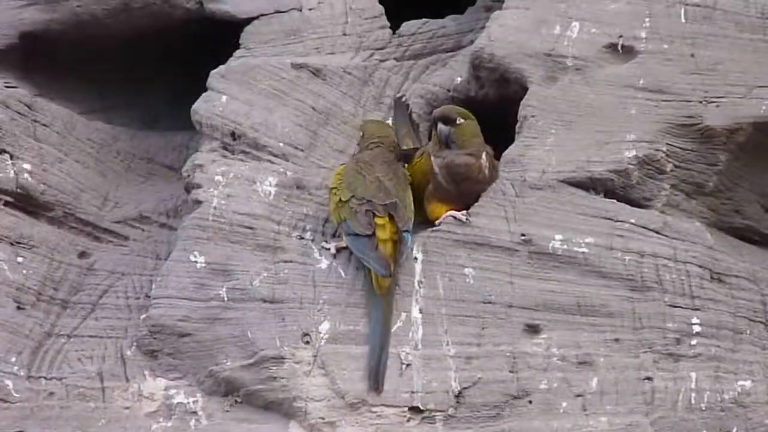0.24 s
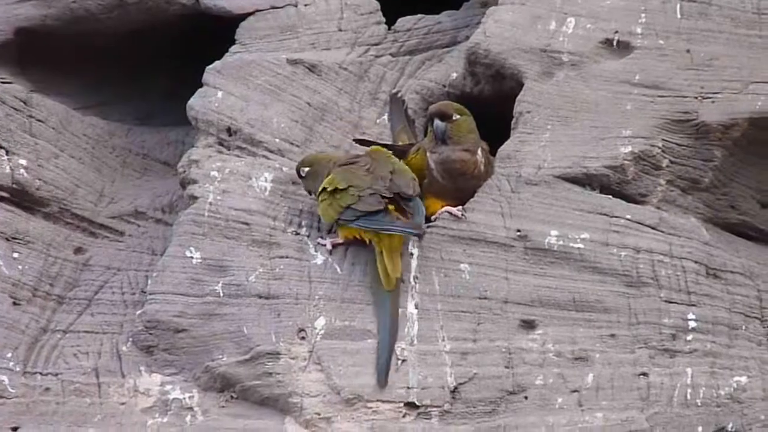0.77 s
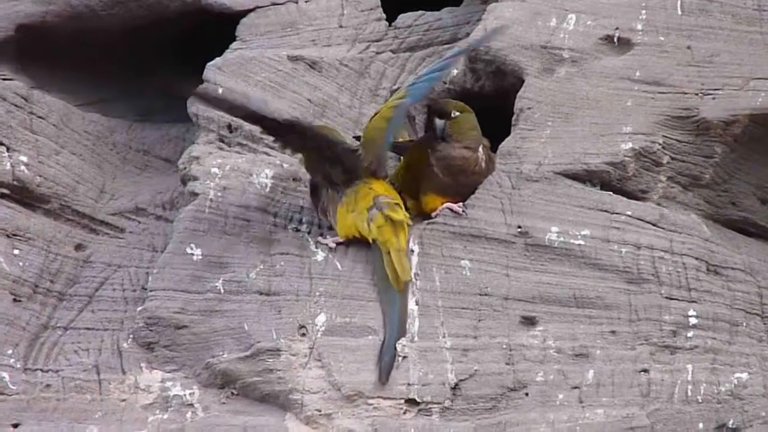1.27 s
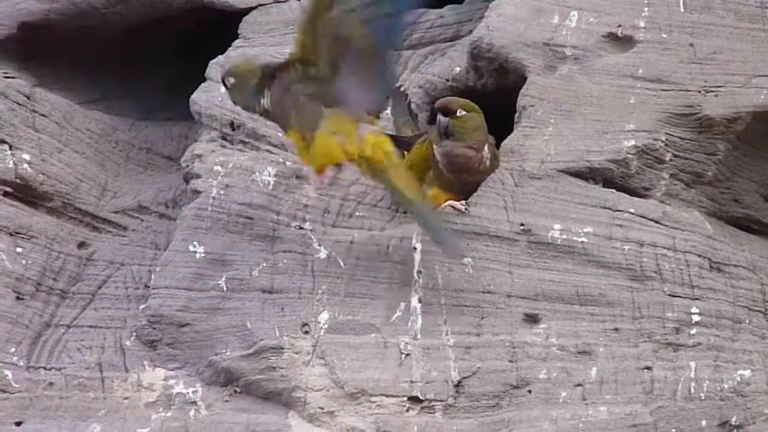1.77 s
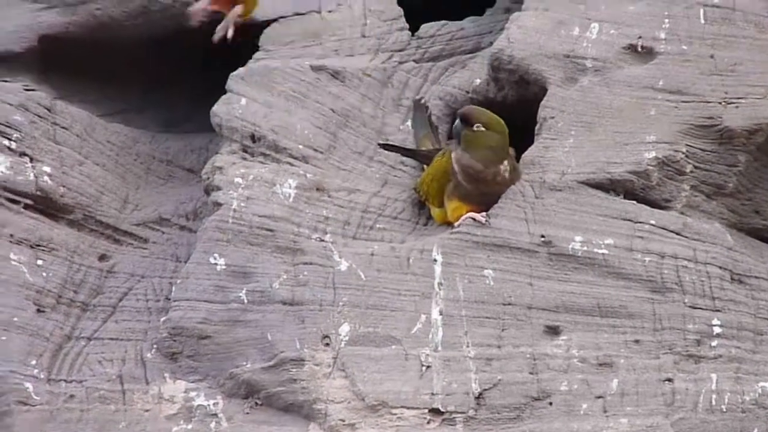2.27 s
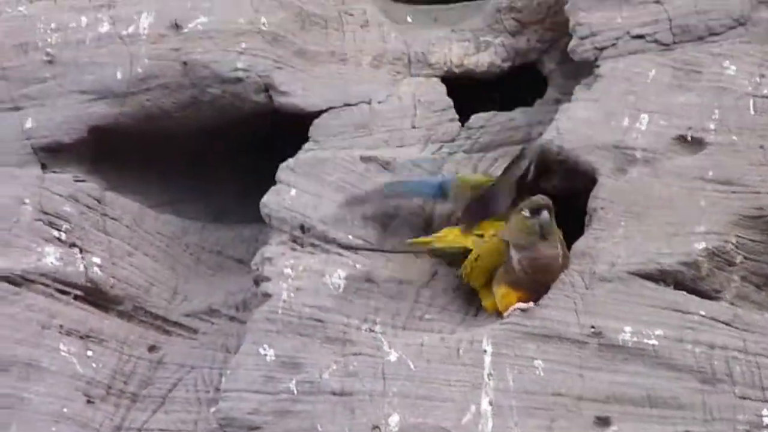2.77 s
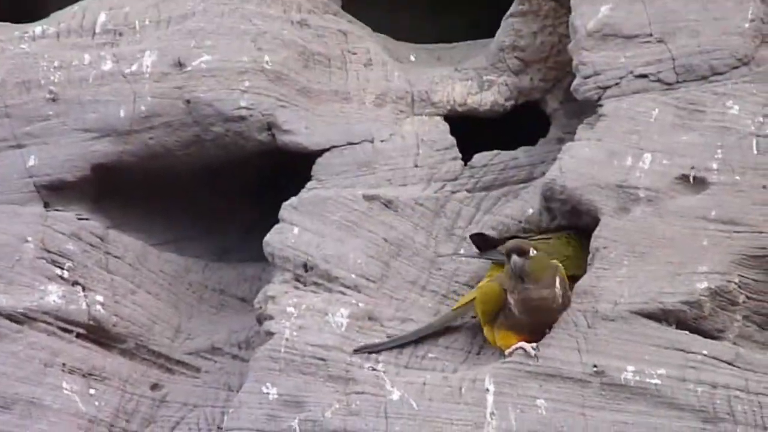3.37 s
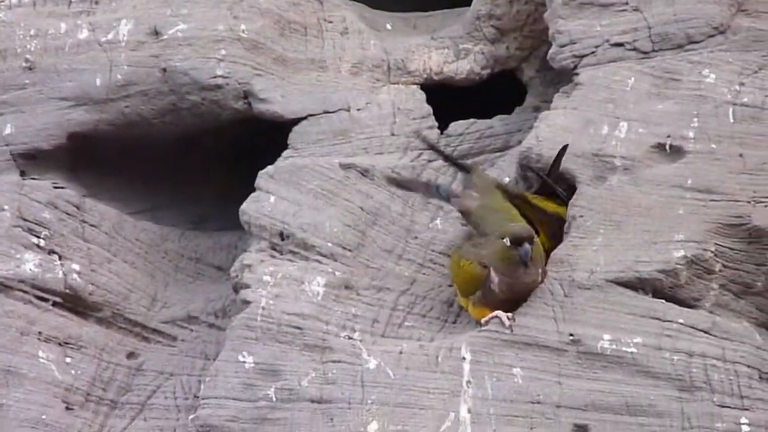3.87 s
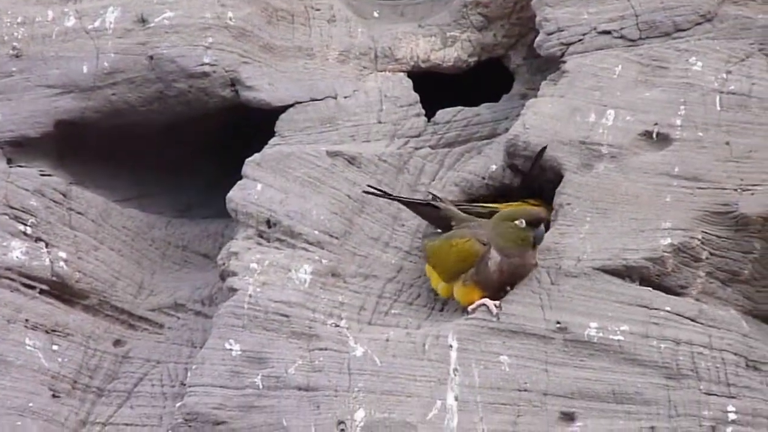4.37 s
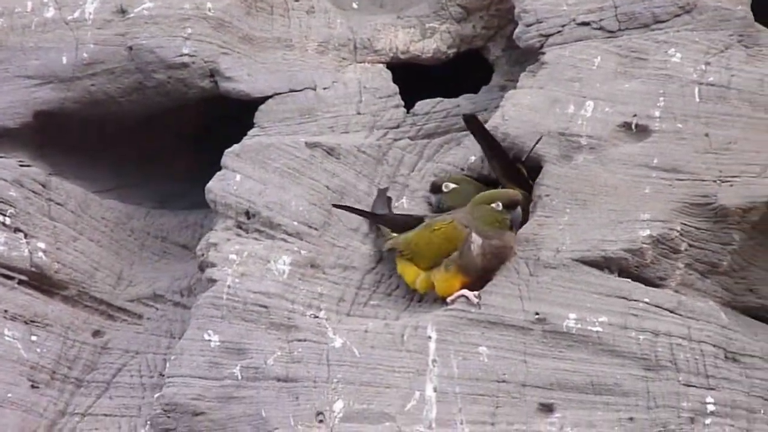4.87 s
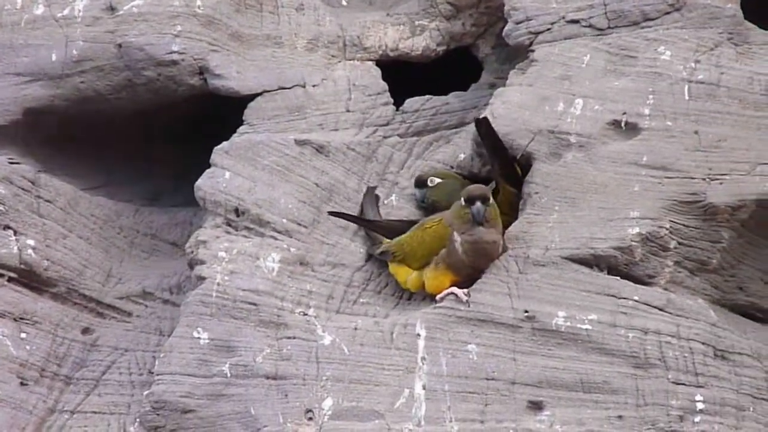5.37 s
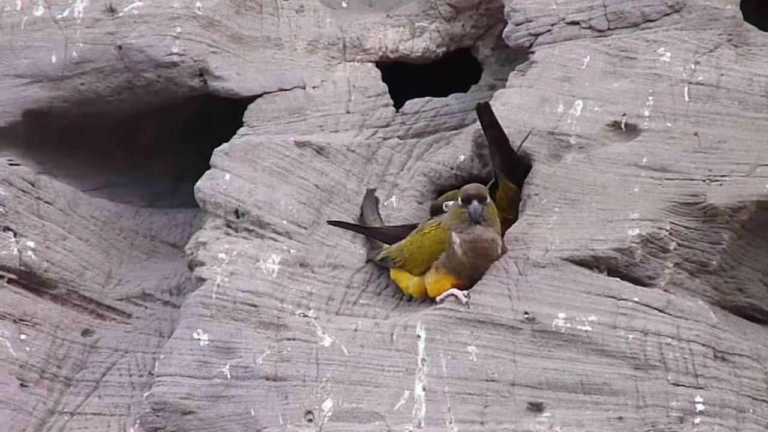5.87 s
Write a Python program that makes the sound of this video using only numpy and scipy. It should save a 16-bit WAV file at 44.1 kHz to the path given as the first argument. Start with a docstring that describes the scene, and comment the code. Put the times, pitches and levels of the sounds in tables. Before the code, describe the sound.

Many parrots call at once, near and far, in quick arched and gliding notes, some clear, some rattled. Low wind buffeting covers the first half, then drops back and returns as separate thuds. A cluster of raspy squawks comes near the middle, then dense whistles carry on to the end. The sound is muffled in the treble, with faint hiss and a brief echo from the rock face.

```python
"""Wind thumps a small microphone while a bright parrot call opens a dense chorus of arched calls,
some clear, some rattled, with a few harsh squawks. Calls are gliding harmonics choked by a flutter;
squawks are stacks of close partials; noise tails give the echo of a cliff; shaped noise is the wind.
Samples at 16 kHz joined by straight lines mirror the chorus faintly in the top treble."""
import sys
import numpy as np
from scipy import signal
from scipy.fft import rfft, irfft, next_fast_len
from scipy.io import wavfile
from scipy.ndimage import uniform_filter1d, map_coordinates

SR = 44100
rng = np.random.default_rng(int(sys.argv[2]) if len(sys.argv) > 2 else 0)


def output_pcm(signal):
    """Save a mono or channel-first signal as 16-bit PCM at the path in sys.argv[1].

    Samples are clipped to [-1, 1] before scaling.
    """
    pcm = np.clip(np.atleast_2d(signal).T, -1, 1) * 32767
    wavfile.write(sys.argv[1], SR, np.round(pcm).astype(np.int16))


def amplitude_ratio(level_db):
    """Convert a level in decibels to the matching linear amplitude (field) ratio."""
    exponent = np.asarray(level_db, float) / 20
    return 10 ** exponent


N = 270333
T = np.arange(N) / SR


def colour(x, points):
    """Weight the spectrum by (Hz, dB) points, joined over log frequency."""
    hz, db = np.transpose(points)
    size = next_fast_len(len(x))
    f = np.maximum(np.arange(size // 2 + 1) * SR / size, 1)
    gain = amplitude_ratio(np.interp(np.log(f), np.log(hz), db))
    return irfft(rfft(x, size) * gain, size)[:len(x)]


def unit(x):
    """Scale to rms 1."""
    return x / np.sqrt(np.mean(x ** 2))


def curve(points):
    """Join (s, value) points by straight lines over the scene."""
    return np.interp(T, *np.transpose(points))


def walk(rate_hz, size):
    """Random levels held 1 / rate_hz and slewed twice; spread near 1."""
    hold = max(int(SR / rate_hz), 1)
    steps = np.repeat(rng.standard_normal(size // hold + 1), hold)
    return 1.288 * uniform_filter1d(uniform_filter1d(steps, hold), hold)[:size]


# Buffet strength before puffs and microphone response. Each row: time in seconds, level in dB.
WIND_LEVEL = [(0, -38.5), (.36, -38.5), (.48, -33), (.85, -31.5), (1.5, -32.5), (1.85, -33.5), (2.1, -29.5),
              (2.33, -32), (2.4, -38.5), (2.55, -36.5), (2.78, -40), (2.84, -47.5), (3.2, -47.5),
              (3.3, -42), (3.95, -40), (4.25, -47.5), (4.52, -51), (4.9, -48), (5.1, -44.5), (5.4, -44.5),
              (5.75, -36.5), (5.9, -59.5), (6.13, -38.5)]
# Single strong puffs. Each row: start in seconds, peak in dB over the wind.
WIND_PUFFS = [(.026, 4), (0.105, 14), (.592, 4.5), (.875, 3.5), (1.09, 4), (1.155, 4.5), (1.371, 3),
              (1.63, 5.5), (1.908, 1.5), (2.58, 4), (3.957, 7), (4.155, 9.5), (4.56, 13), (5.069, 12.5),
              (5.484, 10.5), (5.656, 9), (5.895, 21), (6.015, 19)]
# Relative spectrum of the membrane thumps. Each row: frequency in Hz, density in dB per Hz.
BUFFET_SPECTRUM = [(12, -60), (20, -28), (22, -29), (27, -44), (50, -14), (75, -0.5), (128, -0.5),
                   (147, -3), (177, -6.5), (382, -18.5), (500, -29), (650, -33.5), (1100, -120)]
# Relative spectrum of the thinner rush. Each row: frequency in Hz, density in dB per Hz.
RUSH_SPECTRUM = [(200, 1.5), (330, -5), (700, -9), (1600, -11), (3000, -14), (5000, -29), (7500, -13.5)]
# Rush strength before puffs and microphone response. Each row: time in seconds, level in dB.
RUSH_STRENGTH = [(0, -38.5), (2.76, -40), (2.83, -49.5), (4.4, -47), (4.7, -44), (6.13, -44)]
# Relative spectrum of the slow push of the air. Each row: frequency in Hz, density in dB per Hz.
DEEP_SPECTRUM = [(20, -23), (35, -18), (70, 2), (100, -9), (130, -41)]
# Push strength before the microphone response. Each row: time in seconds, level in dB.
DEEP_STRENGTH = [(0, -57), (3.2, -66), (3.7, -46), (4.2, -45), (4.6, -73), (5.1, -49), (6.13, -67)]
PUFF_RISE_S, PUFF_FALL_S = 0.012, 0.024
RUSH_DB_PER_PUFF_DB = 0.11


def wind():
    """Eddies thump the membrane in short puffs; a thinner rush rides above, a slow push below."""
    puff_db = np.zeros(N)
    for start_s, peak_db in WIND_PUFFS:
        rise = np.clip((T - start_s) / PUFF_RISE_S, 0, 1)
        fall = np.exp(-np.clip(T - start_s - PUFF_RISE_S, 0, 9) / PUFF_FALL_S)
        puff_db += peak_db * rise * fall
    gust_db = 1.16 * walk(25.09, N) + 0.67 * walk(7.0, N)
    rush_gust_db = 0.92 * gust_db + 0.33 * walk(14.0, N)
    buffet = unit(colour(rng.standard_normal(N) * amplitude_ratio(gust_db), BUFFET_SPECTRUM))
    rush = unit(colour(rng.standard_normal(N) * amplitude_ratio(rush_gust_db), RUSH_SPECTRUM))
    deep = unit(colour(rng.standard_normal(N), DEEP_SPECTRUM))
    buffet_db = curve(WIND_LEVEL) + puff_db
    rush_db = curve(RUSH_STRENGTH) + RUSH_DB_PER_PUFF_DB * puff_db
    return amplitude_ratio(buffet_db) * buffet + amplitude_ratio(rush_db) * rush + amplitude_ratio(curve(DEEP_STRENGTH)) * deep


# Knocks on the housing. Each row: centre in seconds, level before microphone in dB, pitch in Hz.
KNOCKS = [(6.029, -20, 190), (6.046, -30, 260)]


def bumps():
    """Soft knocks of about one cycle: sines under a Gaussian swell."""
    out = np.zeros(N)
    for centre_s, level_db, hz in KNOCKS:
        t = T - centre_s
        out += amplitude_ratio(level_db) * np.sin(2 * np.pi * hz * t) * np.exp(-(t * hz * 3.2) ** 2)
    return out


CLIFF_T60_S, NEAR_ECHO_DB, FAR_ECHO_DB = .3, -11, -5


def cliff(near, far):
    """Scattered rock echoes, other ones for each stretch of time; distant birds arrive wetter."""
    t, hop = np.arange(SR // 3) / SR, SR // 12
    decay = np.exp(-np.log(1000) * t / CLIFF_T60_S) * np.clip(t / 0.013, 0, 1)
    decay /= np.sqrt(np.sum(decay ** 2))
    send = np.pad(amplitude_ratio(NEAR_ECHO_DB) * near + amplitude_ratio(FAR_ECHO_DB) * far, (hop, 2 * hop))
    window = np.sin(np.linspace(0, np.pi, 2 * hop))
    echo = np.zeros(len(send) + SR)
    for i in range(0, N + hop, hop):
        tail = rng.standard_normal(len(t)) * decay
        piece = signal.fftconvolve(send[i:i + 2 * hop] * window, tail)
        echo[i:i + len(piece)] += piece
    return near + far + echo[hop:hop + N]


def add_call(out, start_s, length_s, pitches_hz, levels_db, flutter_hz, depth, wobble, hoarse,
             upper_db=(-5.5, 1.5), pull=0.023):
    """One call: a gliding syrinx tone, choked rhythmically by a slower flutter.
    pitches_hz: start, middle, end. levels_db: harmonics 1-3. upper_db: 4 and 5 against the third."""
    start_hz, mid_hz, end_hz = pitches_hz
    start = max(int(start_s * SR), 0)
    n = min(int(length_s * SR), N - start)
    u = np.arange(n) / (length_s * SR) * 2 - 1
    hz = mid_hz + (end_hz - start_hz) / 2 * u + ((start_hz + end_hz) / 2 - mid_hz) * u ** 2
    # every throat takes its own stretch of the wobble
    own = (37 * start) % (N - n)
    shake, rasp = wobble[own:own + n], hoarse[own:own + n]
    flutter = np.cos(2 * np.pi * flutter_hz * (np.cumsum(hz / mid_hz) + 40 * shake) / SR)
    # the flutter both closes the airway and pulls the pitch
    phase = 2 * np.pi * np.cumsum(hz * (1 + 0.01164 * shake + pull * depth * flutter)) / SR
    gains = amplitude_ratio(np.r_[levels_db, levels_db[2] + np.array(upper_db)])
    tone = sum(g * np.sin((k + 1) * (phase + .5 * rasp)) for k, g in enumerate(gains))
    swell = np.clip(6.0 * (1 - np.abs(u)), 0, 1)
    breath = swell * np.exp(depth * 0.89 * flutter) / (1 + depth ** 2)
    out[start:start + n] += np.sqrt(2) * breath * amplitude_ratio(1.38 * shake) * (1 + rasp) * tone


# Colony strength over time, before throat and microphone responses.
# Each row: time in seconds, level in dB, second harmonic against the first in dB.
COLONY = [(0, -61, 6.5), (.17, -46.5, -8), (.55, -54.5, 4), (.66, -48, -2), (.8, -53, 1), (1.2, -50, -11),
          (1.4, -52, 4), (1.66, -46.5, -3.5), (2.3, -49, 3), (2.74, -48.5, 5.5), (2.83, -52.5, 7.5),
          (2.98, -55.5, 0.5), (3.07, -55, 10), (3.15, -49, 7), (3.3, -48, 2.5), (3.5, -46.5, 1.5),
          (3.63, -51, 8.5), (3.71, -52.5, 3), (3.75, -48.5, 2), (3.9, -47, 3.5), (4.6, -47, 2),
          (5.2, -50, 5), (5.55, -47.5, -5), (6.13, -48, 1)]
# Dip between the crowd's two bands. Each row: frequency in Hz, gain in dB.
CROWD_RESPONSE = [(1400, 0.5), (1520, -4), (1720, -3), (1880, 0.5)]
FLOCK_PER_S, FLOCK_HZ, PITCH_SPREAD, FLOCK_THIRD_DB = 38, 1245, .1, -5.5


def far_flock():
    """Many distant birds at chance times, pitched around a usual note; most calls arch."""
    point_s, level_db, second_db = np.transpose(COLONY)
    out, wobble, hoarse = np.zeros(N), .9 * walk(150, N), .2 * walk(700, N)
    for i, c in enumerate(rng.standard_normal((int(FLOCK_PER_S * N / SR), 7))):
        start_s = (i + .5 * c[0]) / FLOCK_PER_S - .05
        if start_s >= N / SR - .01:
            continue
        length_s = .11 * np.exp(.5 * c[1])
        top_hz = FLOCK_HZ * np.exp(PITCH_SPREAD * c[2])
        pitches_hz = top_hz * (.84 + 0.06965 * c[4]), top_hz, top_hz * (.95 + 0.0579 * c[5])
        first = 3.4 * c[3]
        second = first + np.interp(start_s + length_s / 2, point_s, second_db)
        levels_db = first, second, second + FLOCK_THIRD_DB
        add_call(out, max(start_s, 0), length_s, pitches_hz, levels_db,
                 110 * np.exp(.5 * c[6]), .6, wobble, hoarse)
    # the number of open beaks evens out; the colony swells as a whole
    fundamentals = colour(out, [(800, -44.0), (900, 4.0), (1550, 0), (1700, -33.0)])
    crowd = np.sqrt(uniform_filter1d(fundamentals ** 2, int(.12 * SR)))
    return colour(out / crowd, CROWD_RESPONSE) * amplitude_ratio(np.interp(T, point_s, level_db))


def near_voice():
    """Empty track, pitch wobble and hoarseness for near callers."""
    return np.zeros(N), walk(120, N), .33 * walk(900, N)


CHIRPS_PER_S, CHIRP_S, CHIRP_HZ, CHIRP_SPREAD = 40, .035, 1150, 0.11  # usual length and pitch
CHIRP_RISE, CHIRP_GLIDE = .03, .07  # usual half rise and its scatter, shares of pitch
CHIRP_SCATTER_DB = 2


def chirps():
    """Short hoarse calls at chance times from the middle distance, following the colony level."""
    out, wobble, hoarse = near_voice()
    point_s, level_db, _ = np.transpose(COLONY)
    for i, c in enumerate(rng.standard_normal((int(CHIRPS_PER_S * N / SR), 8))):
        start_s = np.clip((i + .5 * c[0]) / CHIRPS_PER_S, 0, N / SR - .01)
        length_s = CHIRP_S * np.exp(.3 * c[5])
        hz = CHIRP_HZ * np.exp(CHIRP_SPREAD * c[1])
        harmonics_db = np.array([-2, -1.5, -8.5]) + CHIRP_SCATTER_DB * c[2:5]
        levels_db = np.interp(start_s, point_s, level_db) + harmonics_db
        glide = CHIRP_RISE + CHIRP_GLIDE * c[6]
        add_call(out, start_s, length_s, (hz * (1 - glide), hz, hz * (1 + glide)), levels_db,
                 110 * np.exp(.4 * c[7]), .4, 1.1 * wobble, 1.1 * hoarse)
    return colour(out, CROWD_RESPONSE)


# Harsh squawks. Each row: start in seconds, length in seconds, top pulse rate in Hz,
# level before throat and microphone responses in dB, throat pitch as share of the usual.
SQUAWK_CALLS = [(0.107, 0.17, 151, -45, 1.001), (2.725, .2, 152.4, -40, 1.067),
                (3.079, .165, 148.9, -38, 1.007), (3.411, 0.12, 152.8, -40, 0.99),
                (3.578, 0.23, 289.5, -46.5, 0.995), (4.285, 0.26, 140, -56, 0.98)]
# Resonances of the open throat. Each row: frequency in Hz, gain in dB.
OPEN_THROAT = [(600, -40), (900, -4.5), (1050, -14), (1250, -6), (1600, -27), (1750, -18), (1900, -0.5),
               (2150, 3.5), (2500, -7), (2900, -17), (3300, -9), (3800, -19), (4500, -13), (5600, -21)]
SQUAWK_START, SQUAWK_END = .86, .84  # pitch, shares of the top
SQUAWK_PLATEAU = 2.4  # higher holds the top pitch longer
SQUAWK_JITTER, SQUAWK_FLICKER_DB, SQUAWK_EDGE = .006, 4, 3.2  # edge: lower swells slower


def squawks():
    """Slow syrinx pulses: close partials that arch in pitch, weighted by the throat resonances."""
    out, wobble = np.zeros(N), walk(80, N)
    throat_hz, throat_db = np.transpose(OPEN_THROAT)
    k = np.arange(1, 45)[:, None]
    for start_s, length_s, top_hz, level_db, throat in SQUAWK_CALLS:
        start, u = int(start_s * SR), np.linspace(-1, 1, int(length_s * SR))
        shake = wobble[start:start + len(u)]
        tilt = (SQUAWK_END - SQUAWK_START) / 2 * u
        arch = ((SQUAWK_START + SQUAWK_END) / 2 - 1) * np.abs(u) ** SQUAWK_PLATEAU
        hz = top_hz * (1 + tilt + arch)
        cycles = np.cumsum(hz * (1 + SQUAWK_JITTER * shake)) / SR
        phase = 2 * np.pi * (k * cycles + rng.random(k.shape))
        gains = amplitude_ratio(np.interp(np.log(k * top_hz), np.log(throat * throat_hz), throat_db,
                              left=-90, right=-90))
        # each partial flickers on its own
        flicker = amplitude_ratio(SQUAWK_FLICKER_DB * np.array([walk(70, len(u)) for _ in k]))
        breath = np.clip(SQUAWK_EDGE * (1 - np.abs(u)), 0, 1) * amplitude_ratio(level_db + 1.5 * shake)
        out[start:start + len(u)] += breath * unit(np.sum(gains * flicker * np.sin(phase), axis=0))
    return out


# Mellow throbbing calls. Each row: start in seconds, length in seconds, start pitch in Hz,
# end pitch in Hz, nominal first harmonic in dB.
THROB_CALLS = [(0.194, 0.079, 1535, 1360, -47), (0.236, 0.2, 1140, 1207, -44),
               (0.261, 0.069, 871, 796, -48), (2.701, 0.08, 1254, 1405, -53), (2.8, 0.14, 1150, 900, -52),
               (3.099, 0.088, 1210, 1240, -45), (3.74, 0.051, 1140, 1200, -48.5),
               (0.327, .1, 1300, 1202, -48), (1.126, .11, 1300, 1415, -49), (0.413, 0.048, 1494, 1420, -52),
               (0.453, 0.15, 1238, 1226, -49.5), (0.722, .16, 1259, 1298, -49), (0.882, .06, 872, 917, -49),
               (1.63, 0.029, 929, 1002, -40), (1.675, .09, 1285, 1230, -46),
               (1.802, 0.051, 1357, 1300, -49), (2.164, 0.036, 1230, 1130, -48),
               (2.22, .09, 1220, 1045, -47), (2.4, 0.13, 981, 912, -47), (3.253, 0.11, 1315, 1228, -57),
               (3.47, 0.069, 1246, 1370, -51), (4.533, 0.082, 846, 940, -51),
               (0.997, 0.24, 1164, 1310, -45.5), (1.585, .09, 1270, 1370, -46),
               (1.925, 0.25, 1211, 1308, -43), (4.101, .24, 1234, 1247, -49), (4.55, 0.19, 1167, 1218, -41),
               (4.608, 0.053, 1470, 1500, -48), (4.737, 0.18, 778, 790, -55), (5.02, 0.19, 1287, 1320, -50),
               (5.271, 0.23, 1154, 1357, -43.5), (5.859, 0.22, 1294, 1235, -47)]
THROB_HZ, THROB_DEPTH, THROB_ARCH = 42, .45, 1.02


def throbs():
    """Mellow calls led by the first harmonic; a slow deep flutter makes them throb."""
    out, _, hoarse = near_voice()
    waver = walk(45, N)
    for start_s, length_s, start_hz, end_hz, db in THROB_CALLS:
        pitches_hz = start_hz, THROB_ARCH * (start_hz + end_hz) / 2, end_hz
        add_call(out, start_s, length_s, pitches_hz, (db, db - 8, db - 15),
                 THROB_HZ, THROB_DEPTH, 1.8 * waver, .45 * hoarse, pull=.02)
    return out


# Steep rising scoops. Each row: start in seconds, length in seconds, start pitch in Hz,
# end pitch in Hz, nominal second harmonic in dB.
SCOOP_CALLS = [(0.151, 0.044, 980, 1137, -43.5), (0.346, .06, 886, 1020, -58),
               (1.142, 0.045, 750, 900, -49), (1.666, 0.043, 935, 1246, -45),
               (3.053, 0.037, 872, 1036, -48.5), (4.282, 0.089, 739, 1262, -50),
               (4.312, 0.056, 766, 990, -53), (4.55, 0.042, 806, 1150, -54),
               (4.997, 0.037, 785, 1168, -42.5), (5.215, 0.064, 757, 1015, -53.5),
               (5.125, .06, 890, 1015, -55), (5.46, .04, 750, 898, -51), (5.292, 0.038, 760, 964, -49),
               (5.731, 0.06, 897, 1170, -47), (5.789, 0.044, 752, 960, -47),
               (6.022, 0.044, 850, 1067, -45.5)]
GLIDE_DONE_HALFWAY = 0.79  # share


def scoops():
    """Rising calls that do most of their glide in the first half, roughened by a fast flutter."""
    out, wobble, hoarse = near_voice()
    for start_s, length_s, start_hz, end_hz, db in SCOOP_CALLS:
        pitches_hz = start_hz, start_hz + GLIDE_DONE_HALFWAY * (end_hz - start_hz), end_hz
        add_call(out, start_s, length_s, pitches_hz, (db - 4.5, db, db - 6.5),
                 140, .45, .7 * wobble, .8 * hoarse)
    return out


# Bright calls with open beak. Each row: start in seconds, length in seconds, start pitch in Hz,
# end pitch in Hz, nominal second harmonic in dB, pitch-bend rate in Hz.
BRIGHT_CALLS = [(0, 0.061, 1271, 1190, -47, 42), (1.528, 0.054, 1036, 1127, -44.5, 7),
                (4.295, 0.073, 946, 1176, -52, 4.3), (5.734, 0.055, 967, 1160, -53, 5.9)]
BRIGHT_BEND = 1.22


def brights():
    """Open-beak calls: strong third harmonic; pitch bent slowly, or wavering quickly in the first."""
    out, wobble, hoarse = near_voice()
    for start_s, length_s, start_hz, end_hz, db, bend_hz in BRIGHT_CALLS:
        pitches_hz = start_hz, start_hz + GLIDE_DONE_HALFWAY * (end_hz - start_hz), end_hz
        add_call(out, start_s, length_s, pitches_hz, (db - 3.5, db, db - 0.5),
                 bend_hz, .3, .2 * wobble, .2 * hoarse, pull=.025 * BRIGHT_BEND / .3)
    return out


# Pure, steady notes. Each row: start in seconds, length in seconds, start pitch in Hz,
# end pitch in Hz, nominal second harmonic in dB.
PIPE_NOTES = [(0.637, .062, 1130, 1144, -38)]


def pipes():
    """Nearly pure notes: the second harmonic dominates and the flutter is slight."""
    out, wobble, hoarse = near_voice()
    for start_s, length_s, start_hz, end_hz, db in PIPE_NOTES:
        pitches_hz = start_hz, max(start_hz, end_hz), end_hz
        add_call(out, start_s, length_s, pitches_hz, (db - 22, db, db - 22.5),
                 60, .02, .15 * wobble, .1 * hoarse, upper_db=(10.5, -10))
    return out


# Whistles of near birds. Each row: start in seconds, length in seconds, start pitch in Hz,
# end pitch in Hz, nominal second harmonic in dB.
WHISTLE_CALLS = [(0.205, 0.051, 1010, 1130, -44.5), (0.328, 0.041, 1300, 1370, -47),
                 (0.775, 0.04, 1290, 1250, -42.5), (.815, .06, 1220, 1140, -44),
                 (0.752, 0.19, 963, 1005, -51), (0.859, 0.11, 1043, 1090, -47),
                 (0.977, .03, 1138, 1085, -44.5), (1.046, 0.048, 939, 1134, -49),
                 (1.109, .085, 1210, 1325, -49), (1.13, 0.058, 1184, 1140, -47),
                 (1.189, 0.083, 1230, 1370, -46), (1.274, 0.073, 1338, 1257, -44.5),
                 (1.29, 0.089, 860, 955, -54.5), (1.38, 0.084, 1020, 1065, -51),
                 (1.456, 0.091, 1011, 942, -45), (1.615, 0.054, 986, 1027, -43.5),
                 (1.674, 0.052, 1280, 1205, -43), (1.741, 0.073, 1170, 1230, -47.5),
                 (1.887, .06, 973, 937, -46), (1.951, 0.07, 952, 1030, -46),
                 (1.989, 0.042, 1193, 1193, -47), (2.075, 0.048, 1020, 1203, -39.5),
                 (2.171, 0.022, 1131, 1220, -41), (2.223, 0.057, 1186, 1056, -42.5),
                 (2.289, 0.14, 1083, 1074, -43.5), (2.262, 0.029, 1020, 1180, -43),
                 (2.342, 0.021, 781, 950, -42.5), (2.465, 0.058, 920, 1076, -43),
                 (2.51, 0.035, 1066, 1080, -44), (2.548, 0.03, 1174, 1190, -41.5),
                 (2.669, .11, 946, 1030, -43.5), (2.714, 0.026, 1170, 1185, -44),
                 (3.501, .03, 1210, 1310, -46), (0.421, 0.039, 1190, 1238, -46),
                 (0.518, 0.023, 1245, 1223, -55), (.565, .03, 1260, 1250, -57),
                 (3.777, 0.05, 900, 1138, -46.5), (3.829, .045, 1206, 1284, -41.5),
                 (3.877, 0.1, 1097, 1026, -42.5), (3.996, 0.046, 1014, 1207, -41),
                 (4.065, 0.05, 1270, 1210, -41), (4.239, .07, 1250, 1280, -60),
                 (4.355, .087, 1239, 1275, -45), (4.36, .06, 1065, 1140, -48),
                 (4.408, 0.11, 1130, 878, -62), (4.52, .05, 1186, 1133, -49), (5.395, .03, 1380, 1150, -44),
                 (5.43, .03, 1110, 1356, -47.5), (2.6, .07, 997, 840, -50), (2.622, .07, 1262, 1100, -46),
                 (2.41, .03, 1087, 1040, -42), (3.54, .07, 1295, 1230, -54), (.52, .09, 1245, 1200, -57),
                 (0.366, .07, 923, 1025, -56), (0.233, .05, 1330, 1300, -49), (1.084, .06, 940, 1150, -53),
                 (4.454, 0.066, 1268, 1257, -41.5), (4.515, 0.044, 1240, 1140, -56),
                 (4.614, 0.044, 1073, 1000, -42), (4.655, .08, 1020, 974, -46),
                 (4.756, 0.05, 1255, 1164, -43), (4.721, 0.031, 1020, 898, -42),
                 (4.868, 0.02, 1120, 1156, -38.5), (4.893, 0.048, 1163, 1070, -39.5),
                 (4.922, 0.039, 960, 1030, -41), (4.954, .045, 1335, 1220, -42),
                 (5.016, 0.02, 1210, 1170, -39), (5.045, 0.035, 1155, 1231, -40.5),
                 (5.1, 0.043, 1194, 1156, -44), (5.156, .08, 1190, 1210, -51),
                 (5.243, .04, 929, 1040, -42.5), (5.321, 0.053, 1101, 1262, -45),
                 (5.369, 0.027, 1148, 1160, -38.5), (5.385, .04, 913, 816, -52),
                 (5.5, 0.11, 1183, 1006, -44.5), (5.408, 0.032, 1108, 1130, -42.5),
                 (5.544, 0.042, 1142, 1112, -44.5), (5.602, 0.079, 939, 1006, -47),
                 (5.686, 0.07, 990, 1103, -41.5), (5.803, 0.089, 1226, 1153, -41),
                 (5.881, 0.12, 1255, 1245, -40.5), (6.047, 0.064, 1163, 1234, -43),
                 (6.088, 0.045, 956, 1110, -40)]
BRIEF_CLEAR_S = .088  # whistles held at least this long turn hoarser


def whistles():
    """Straight glides led by the second harmonic; roughness grows for the long ones."""
    out, wobble, hoarse = near_voice()
    for start_s, length_s, start_hz, end_hz, db in WHISTLE_CALLS:
        rough = .7 if length_s < BRIEF_CLEAR_S else 1.1
        pitches_hz = start_hz, (start_hz + end_hz) / 2, end_hz
        add_call(out, start_s, length_s, pitches_hz, (db - 7.5, db, db - 8.5),
                 55, .38 * rough, 1.6 * rough * wobble, rough * hoarse, upper_db=(-2.5, -10))
    return out


# Throat response shared by all birds. Each row: frequency in Hz, gain in dB.
BIRD_THROAT = [(800, 1), (1050, -4.5), (1260, 0.5), (1500, 2.5), (1650, 4), (1800, 3.5), (1950, 0)]


def scene():
    """Birds and their echo, wind and knocks."""
    near = chirps() + squawks() + throbs() + scoops() + brights() + pipes() + whistles()
    birds = colour(cliff(near, far_flock()), BIRD_THROAT)
    return (birds + wind() + bumps())[None]


def roll_off(x):
    """The treble ends steeply here."""
    return signal.sosfilt(signal.butter(12, 15680, fs=SR, output="sos"), x)


# Dull microphone response. Each row: frequency in Hz, gain in dB.
MICROPHONE_RESPONSE = [(20, -1.5), (2550, 0.5), (3000, -10.5), (5000, -19), (7000, -53)]
# Treble limit after the straight lines. Each row: frequency in Hz, gain in dB.
TREBLE_LIMIT = [(14900, 0), (15150, -50)]
HISS_DB, WHINE_DB, WHINE_HZ = -66.5, -85.5, 6666.7  # hiss level before the 8 kHz limit
SAMPLING_HZ, OFFSET = 16000, -.0048


def record(dry):
    """Dull microphone, hiss and whine, 16 kHz samples joined by straight lines, constant offset."""
    x = colour(dry[0], MICROPHONE_RESPONSE)
    hiss = amplitude_ratio(HISS_DB) * rng.standard_normal(N)
    whine = amplitude_ratio(WHINE_DB) * np.sin(2 * np.pi * WHINE_HZ * T)
    x = colour(x + hiss + whine, [(7970, 0), (8000, -60)])
    ticks_s = np.arange(int(N / SR * SAMPLING_HZ) + 1) / SAMPLING_HZ
    samples = map_coordinates(x, [ticks_s * SR], order=3, mode="nearest")
    # straight lines leave mirror images above 8 kHz
    joined = np.interp(T, ticks_s, samples)
    mix = colour(joined, TREBLE_LIMIT)[None] + OFFSET
    return roll_off(mix)


dry = scene()
out = record(dry)
output_pcm(out)
```